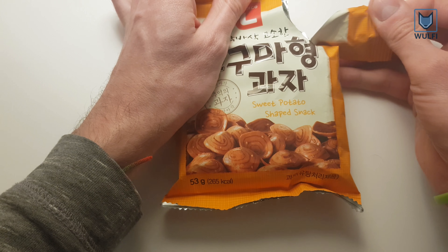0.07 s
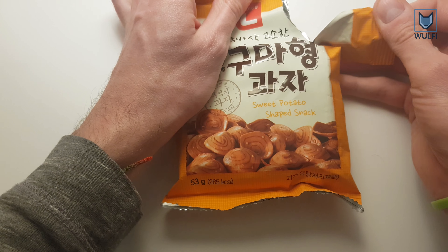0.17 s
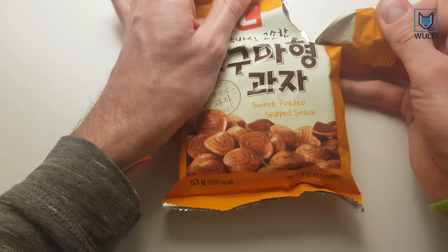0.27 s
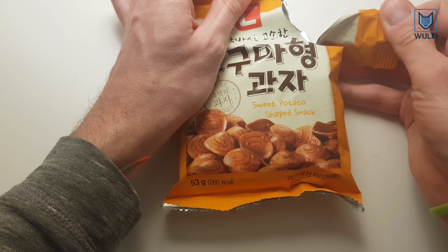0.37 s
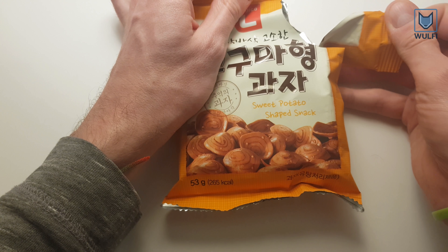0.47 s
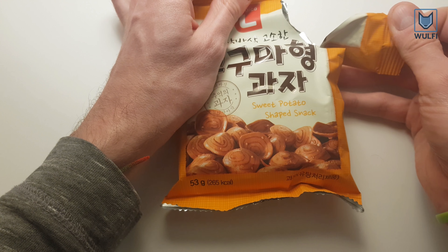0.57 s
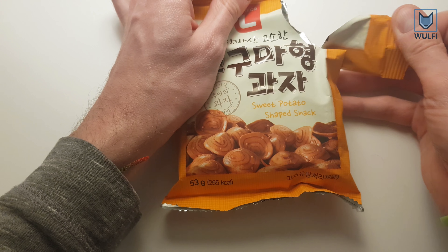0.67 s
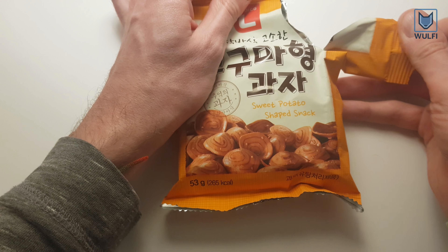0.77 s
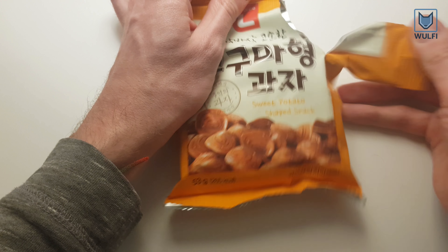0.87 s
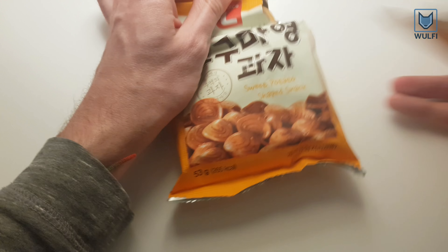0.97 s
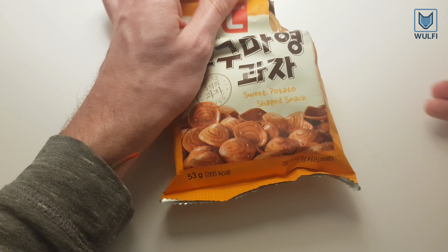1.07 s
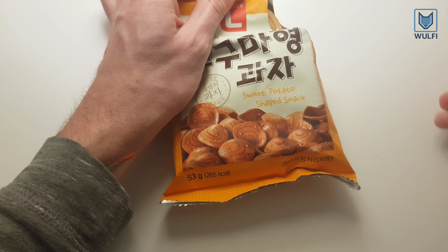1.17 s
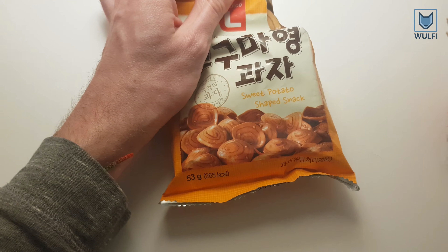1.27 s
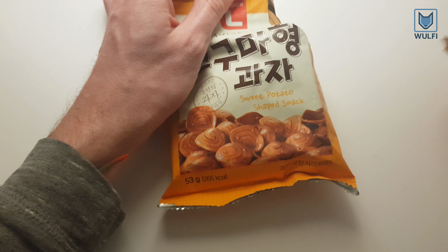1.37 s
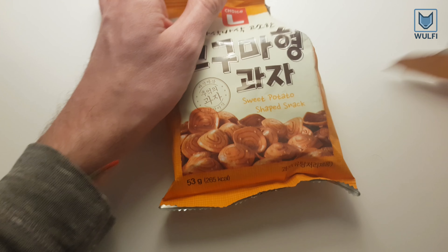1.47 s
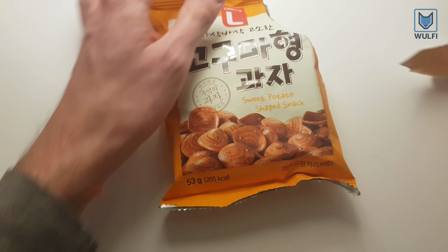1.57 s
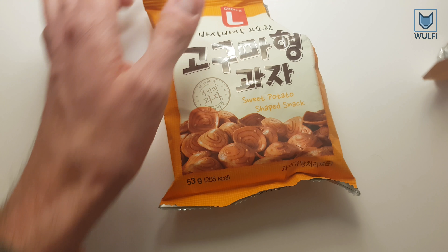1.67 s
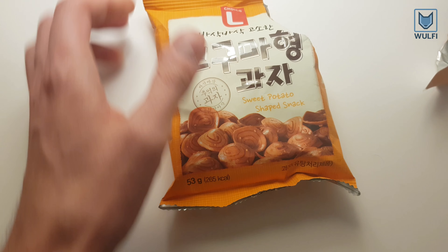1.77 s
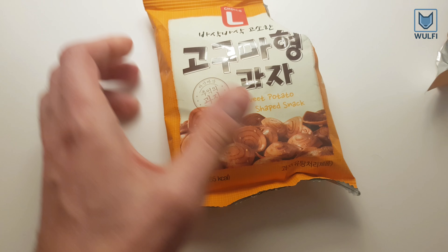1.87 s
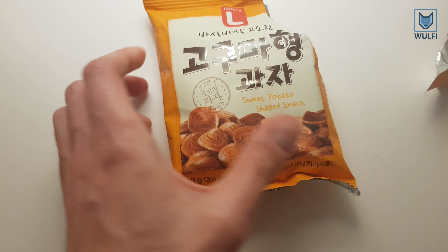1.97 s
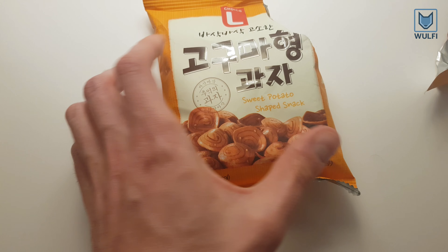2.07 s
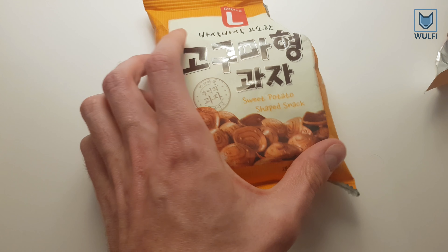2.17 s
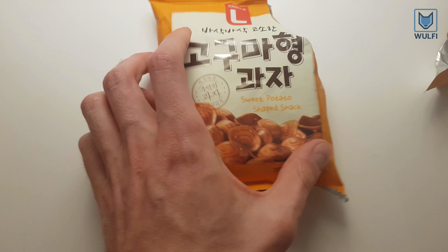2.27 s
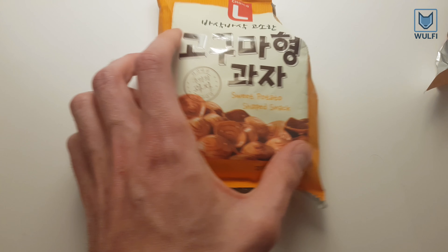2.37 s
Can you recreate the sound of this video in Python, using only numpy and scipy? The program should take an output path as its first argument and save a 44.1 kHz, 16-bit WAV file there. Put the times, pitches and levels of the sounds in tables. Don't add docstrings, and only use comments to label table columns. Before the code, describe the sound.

Close stereo pickup of a foil-lined snack bag: scattered sharp crinkles, a dense loud rip around one second, a softer burst of crackles as it settles, then quiet with faint finger contact in a small room.

```python
import sys
import numpy as np
from scipy import signal
from scipy.fft import rfft, irfft, next_fast_len
from scipy.io import wavfile
from scipy.ndimage import uniform_filter1d

SR = 44100
rng = np.random.default_rng(int(sys.argv[2]) if len(sys.argv) > 2 else 0)


def digitize_waveform(pressure):
    field = np.atleast_2d(pressure).T
    bounded = np.clip(field, -1, 1)
    quanta = np.round(bounded * 32767).astype(np.int16)
    wavfile.write(sys.argv[1], SR, quanta)


def invert_db(level):
    return 10 ** (np.asarray(level, dtype=float) / 20)


N = 105840

# start_s, level_db, ring_hz, depth_db, brightness_db
TEARING_CREASES = [(0.008, -39.5, 900, 8, -4), (0.026, -27.5, 3440, 1.5, -10.5),
                   (0.0941, -30, 6600, -12.5, -13.5), (0.1394, -40.5, 810, 11.5, -16),
                   (0.1765, -34.5, 2700, -1.5, -4.5), (0.1885, -21.5, 7100, -8, -8),
                   (0.2017, -32.5, 3340, -11, -6), (0.2201, -36.5, 2900, 2.5, -16.5),
                   (0.2256, -19, 4800, -20, -4.0), (0.2398, -40.5, 2950, -9.5, -7.5),
                   (0.2599, -16.5, 1765, 0.5, -6.5), (0.2762, -39, 5050, 10, 11),
                   (0.2955, -25.5, 1470, 11.5, 3), (0.4132, -37, 1660, -11.5, -15.5),
                   (0.4305, -60.5, 1460, 7, -10.5), (0.4417, -26.0, 2020, -9, -26.5),
                   (0.4473, -16.5, 1760, -9.5, -1.5), (0.4535, -28.5, 8200, 10.5, 1),
                   (0.4596, -13, 3270, -14.5, -2.5), (0.5032, -30.5, 3200, -2.5, -15.5),
                   (0.5113, -27, 3500, 8, -5.5), (0.5185, -34.5, 3340, -1, -16),
                   (0.5492, -29.5, 1940, -1.5, -7), (0.5718, -37.5, 3700, -7, -9.5),
                   (0.5859, -27.5, 4430, 5.5, -4.5), (0.6006, -27.5, 3420, -1.5, -13.0),
                   (0.6673, -31, 1430, 8.5, -26), (0.671, -31, 917, 13.0, -21.0),
                   (0.6832, -14, 7200, -7, -0.5), (0.7083, -32, 1420, 4.5, -11),
                   (0.716, -20, 3030, 7.5, -5.5)]
# start_s, level_db, ring_hz, depth_db, brightness_db
RIPPING_CREASES = [(0.758, -14.5, 6580, -3, -9.5), (0.7694, -19.5, 6280, -0.5, -4),
                   (0.7727, -23.5, 2050, -2, -4.5), (0.8045, -37.5, 770, 6.5, -8.5),
                   (0.8253, -20.5, 2780, 2, -6), (0.8441, -33.5, 1570, 7, -13.0),
                   (0.8858, -45.5, 4430, 0.5, -6), (0.9092, -34, 7350, -5.5, -2.0),
                   (0.9113, -34.5, 1420, 4.5, -14), (0.9493, -18.5, 1960, 2.5, -11.0),
                   (0.9617, -28.5, 1180, 2, -13.0), (0.9662, -29, 1080, 6, -6.0),
                   (0.9725, -10.5, 6800, -3.5, -8.5), (0.9771, -27, 6500, 0.5, -1.5),
                   (0.9849, -20.5, 2450, -0.5, -5), (0.9884, -9.5, 1970, 1.5, -4),
                   (0.9983, -14, 3880, 7, -6.5), (1.0043, -19, 4010, 5, -6), (1.0147, -19.0, 1190, 8.5, -9),
                   (1.0191, -16.5, 906, 1, -6.5), (1.0215, -23.5, 900, 2.5, -6),
                   (1.0303, -25.5, 1290, 6, -6), (1.045, -15.5, 3220, -6, -5.5),
                   (1.0538, -20.5, 4020, -3, -2.5), (1.0563, -11.5, 1800, 3, -7.5),
                   (1.0587, -17.5, 1800, -1.5, -9), (1.0618, -14, 4300, -3.0, -8),
                   (1.064, -17.5, 2140, 0.5, -12.5), (1.076, -15, 4440, -4, -4),
                   (1.0783, -13, 4030, -6.5, 9.5), (1.081, -16, 1630, -2, -2),
                   (1.087, -21.5, 1507, 4, -6.5), (1.0952, -26, 1519, 8, -6),
                   (1.133, -34.5, 1980, -4, -13.5), (1.1413, -37.5, 3260, -6.5, -14),
                   (1.152, -37.5, 3360, 15, -14.5), (1.153, -41.5, 2025, -7, -10),
                   (1.1934, -29, 3920, -21, -8), (1.2014, -31.5, 3740, -21, -15),
                   (1.2351, -38.5, 1370, -2, -24)]
# start_s, level_db, ring_hz, depth_db, brightness_db
SETTLING_CREASES = [(1.2529, -47.5, 1580, -1, -25), (1.2964, -43, 1310, 7.5, -18),
                    (1.301, -35.5, 3430, 9, -8.5), (1.3107, -35, 1970, 1.0, -22),
                    (1.3487, -36, 1526, 5, -21), (1.3847, -32.0, 2740, -2, -11.5),
                    (1.4027, -27.5, 3100, -8, -14.5), (1.4184, -23, 2880, -22, -11.5),
                    (1.4213, -24.0, 3330, -9.5, -6), (1.4326, -19, 6170, -9, -7),
                    (1.46, -32, 3520, -10, -7.5), (1.476, -40, 3300, -11, -11),
                    (1.4855, -34, 1510, -1.5, -10.5), (1.4895, -30.5, 3200, -12, -14.5),
                    (1.4953, -23, 3560, -6.5, -12), (1.5039, -24, 1340, 0.5, -7.5),
                    (1.5084, -28, 910, 1, -17.5), (1.5141, -27.5, 5200, 5, -8),
                    (1.5279, -17, 3560, -5, 1.5), (1.533, -19.5, 3400, -5, -5.5),
                    (1.5375, -25, 900, 8, -12.0), (1.5411, -34, 940, -1.5, -20),
                    (1.5573, -39, 5860, -2, 11.5), (1.5666, -46, 1340, 27, -16.5),
                    (1.5713, -33.5, 900, -1, -20), (1.5783, -34, 4060, -9, -27),
                    (1.5861, -20, 3150, 10.5, -4), (1.5884, -23.0, 1282, -1.5, -11),
                    (1.5964, -29, 3220, 9, -7.5), (1.6032, -28, 2580, 5.5, -9.5),
                    (1.7085, -44.5, 1330, -2.5, -11), (1.714, -40, 2480, -10, -14),
                    (1.7395, -42.5, 3630, -9, -17), (1.7589, -48.5, 1567, -14, -21),
                    (2.2874, -52, 2380, -3, -8), (2.3047, -47, 4230, 4.5, -7),
                    (2.3922, -34, 2090, -2.5, -17)]


def snaps():
    rows = TEARING_CREASES + RIPPING_CREASES + SETTLING_CREASES
    return invert_db(0.5) * ring_creases(rows, count=48, size=640)


# time_s, level_db
FILM_STRAIN = [(0, -62.5), (.15, -70), (.25, -54.5), (.4, -70.5), (.5, -55), (.78, -54), (.94, -66),
               (.97, -37.5), (1.03, -40), (1.07, -35.5), (1.12, -48.5), (1.38, -68), (1.46, -56),
               (1.53, -42), (1.62, -53.5), (1.85, -80)]


def crackle():
    per_s, scatter_db = 450, 4
    r = rng.random((round(per_s * 1.9), 4))
    grid = np.linspace(0, FILM_STRAIN[-1][0], len(r))
    share = np.cumsum(invert_db(curve(FILM_STRAIN, grid) / 4))
    start_s = np.interp((np.arange(len(r)) + r[:, 0]) / len(r), share / share[-1], grid)
    level_db = curve(FILM_STRAIN, start_s) - scatter_db * np.log(r[:, 1] + 0.09)
    ring_hz = 800 * 8 ** r[:, 2]
    depth_db = 6 - 14 * r[:, 2]
    brightness_db = -12 + 12 * r[:, 3]
    rows = np.transpose([start_s, level_db, ring_hz, depth_db, brightness_db])
    return ring_creases(rows, count=14, size=220)


# mode_hz, level_db
FILM_MODES = [(500, -8), (850, -1.5), (1900, -3.5), (2500, -3.5), (3400, 1.5), (7000, -5.5), (16000, -14.5)]
# mode_hz, t60_s
FILM_RING_TIME = [(500, 0.022), (1500, 0.02), (4000, 0.0092), (16000, 0.016)]
# mode_hz, scatter_rad
MIC_SCATTER = [(300, 0.13), (1000, 0.23), (8000, 1.635)]


def ring_creases(rows, count, size):
    near_db, near_octaves, scatter_db, side_db = 8, 0.083, 2.5, 1.5
    spread_cycles, rise_s = 1.279, 0.000052
    start_s, level_db, ring_hz, depth_db, brightness_db = np.transpose(rows)[:, :, None]
    u = rng.random((len(start_s), 3, count))
    g = rng.standard_normal((len(start_s), 4, count))

    hz = 500 * 32 ** (((np.arange(count) + u[:, 0]) / count) ** 0.59)
    hz[:, :1] = ring_hz

    near = np.exp(-0.5 * (np.log2(hz / ring_hz) / near_octaves) ** 2)
    treble = np.clip(np.log2(hz / 2500), 0, 1.3) * (brightness_db + 8.5)
    bass = np.clip(np.log2(1900 / hz), 0, 1.1) * (depth_db - 1.0)
    gain = invert_db(along(FILM_MODES, hz) + near_db * near + treble + bass + scatter_db * g[:, 0])

    late_s = -spread_cycles / hz[..., None] * np.log(u[:, 1, :, None] + 1e-9)
    t = np.maximum(np.arange(size) / SR - late_s, 0)
    decay = invert_db(-60 * t / along(FILM_RING_TIME, hz)[..., None])
    shape = gain[..., None] * decay * (1 - np.exp(-t / rise_s))

    turn = along(MIC_SCATTER, hz) * g[:, 1]
    phase = 2 * np.pi * (hz[..., None] * t + u[:, 2, :, None])
    sides = []
    for k in (1, -1):
        modes = shape * invert_db(k * side_db * turn)[..., None] * np.sin(phase + k * turn[..., None])
        sides.append(modes.sum(axis=1))
    sound = np.stack(sides, axis=1)

    power = np.abs(uniform_filter1d((sound ** 2).mean(axis=1), size=50))
    loudest = np.sqrt(power.max(axis=1))[:, None, None]
    return place(np.maximum(start_s[:, 0] - 0.0003, 0), sound * invert_db(level_db[..., None]) / loudest)


# start_s, level_db, pitch_hz
BAG_PUSHES = [(0.2595, -44, 411), (0.766, -30.5, 422), (0.804, -39, 368), (0.842, -42.5, 441),
              (0.965, -31.5, 324), (1.015, -25, 381.4), (1.056, -28.5, 235.7), (1.086, -25.5, 471),
              (1.308, -44.5, 290), (1.402, -41.5, 419), (1.521, -35.5, 470.5), (1.526, -41, 170),
              (1.585, -43, 170), (2.286, -51, 276)]
# mode_hz, width_hz, level_db
TABLE_MODES = [(170, 13, 7), (232, 6, 6.5), (489, 4, 5.5)]


def table_top(f):
    response = 1
    for mode_hz, width_hz, level_db in TABLE_MODES:
        damping = 1j * f * width_hz
        response = response + invert_db(level_db) * damping / (mode_hz ** 2 - f ** 2 + damping)
    return response


def air_pocket():
    push_db, under_db, t60_s, rise_s = 11, -17, 0.04, 0.003
    start_s, level_db, pitch_hz = np.transpose(BAG_PUSHES)[:, :, None]
    t = np.arange(SR // 10) / SR
    u = rng.random((len(start_s), 3, 1))
    under_hz = pitch_hz[:, None] * (0.33 + 0.6 * u)
    under = invert_db(under_db) * np.sin(2 * np.pi * under_hz * t).sum(axis=1)
    swell = invert_db(level_db + push_db - 60 * t / t60_s) * (1 - np.exp(-t / rise_s))
    puff = swell * (np.sin(2 * np.pi * pitch_hz * t) + under)
    return filtered(place(start_s.ravel(), np.stack([puff, puff], axis=1)), table_top)


# time_s, level_db
FINGER_RUB = [
    (2.277, -72.5),
    (2.29, -51.5),
    (2.4, -52.5),
]
# frequency_hz, density_db (dB per Hz)
SKIN_COLOUR = [(70, -11.5), (150, 2.5), (600, -12.5), (4140, -11), (12500, -27.5), (16000, -52)]


def fingers():
    grain = invert_db(2 * unit(uniform_filter1d(rng.standard_normal(N), size=120)))
    rub = unit(grain * noise(SKIN_COLOUR, alike=0.39))
    return rub * invert_db(curve(FINGER_RUB, np.arange(N) / SR))


def near_wall(f):
    delay_s, right_lag_s, low_edge_hz = 0.0063, 0.00022, 900
    lag_s = delay_s + right_lag_s * np.array([[0], [1]])
    return 1 + invert_db(-20) * np.exp(-2j * np.pi * f * lag_s) * 1j * f / (low_edge_hz + 1j * f)


# frequency_hz, t60_s
ROOM_DECAY = [(150, 1), (600, 0.38), (3000, 0.4), (15000, 0.23)]


def room(x):
    out = np.zeros((2, N + SR))
    step = SR // 20
    for a in range(0, N, step):
        hz, t, z = signal.stft(rng.standard_normal((2, SR // 2)), SR, nperseg=256)
        decay = invert_db(-60 * t / along(ROOM_DECAY, hz)[:, None])
        tail = signal.istft(z * decay, SR, nperseg=256)[1]
        tail[1] = 0.5 * tail[0] + 0.83 * tail[1]
        wet = signal.fftconvolve(x[None, a:a + step], tail / np.linalg.norm(tail[0]), axes=1)
        out[:, a + 220:][:, :wet.shape[1]] += wet
    return out[:, :N]


# frequency_hz, density_db (dB per Hz)
HUSH_COLOUR = [(25, -16), (95, 0.5), (300, -33.5), (1500, -32.5), (7000, -30), (15600, -22.5)]


def hush():
    return invert_db(-74.5) * noise(HUSH_COLOUR, alike=0.37)


def unit(x):
    return x / np.sqrt(np.mean(x ** 2) + 1e-20)


def along(points, hz):
    f, v = np.transpose(points)
    return np.interp(np.log(hz + 1), np.log(f + 1), v)


def curve(rows, s):
    return np.interp(s, *np.transpose(rows))


def noise(spectrum, alike):
    a, b = rng.standard_normal((2, N))
    hz = np.fft.rfftfreq(N, 1 / SR)
    pair = np.array([a, alike * a + np.sqrt(1 - min(alike, 0.99) ** 2) * b])
    colour = invert_db(along(spectrum, hz)) * (hz < spectrum[-1][0])
    return unit(irfft(rfft(pair) * colour, N))


def place(starts_s, sounds):
    out = np.zeros((2, N + sounds.shape[2]))
    for s, sound in zip(starts_s, sounds):
        out[:, int(s * SR):][:, :sound.shape[1]] += sound
    return out[:, :N]


def filtered(x, response):
    m = next_fast_len(N + SR)
    return irfft(rfft(x, m) * response(np.fft.rfftfreq(m, 1 / SR)), m)[..., :N]


def scene():
    bag = snaps() + crackle() + air_pocket() + fingers()
    bag = filtered(bag, lambda f: (1j * f / (130 + 1j * f)) ** 2)
    bag = filtered(bag, near_wall)
    return bag + invert_db(-11.5) * room(bag.mean(axis=0)) + hush()


def low_pass(x):
    return signal.sosfilt(signal.butter(12, 16400, fs=SR, output="sos"), x)


def record(dry):
    rounded = dry / (1 + np.abs(dry / 0.9) ** 10) ** (1 / 10)
    mix = filtered(rounded, lambda f: 1 / np.sqrt(1 + (f / 14800) ** 20))
    return low_pass(mix)


dry = scene()
out = record(dry)
digitize_waveform(out)
```